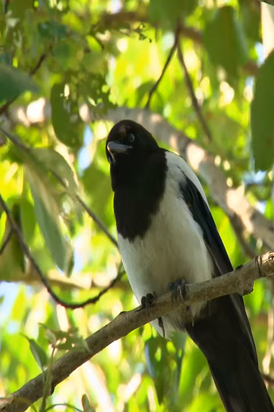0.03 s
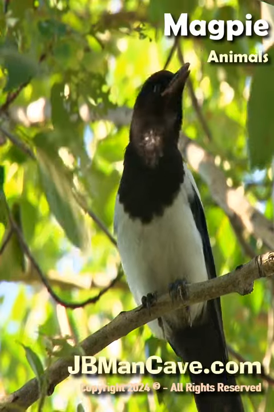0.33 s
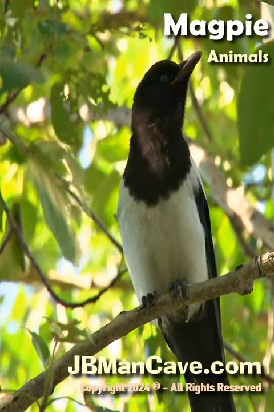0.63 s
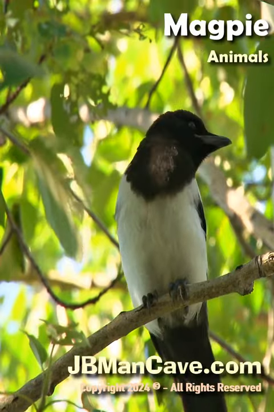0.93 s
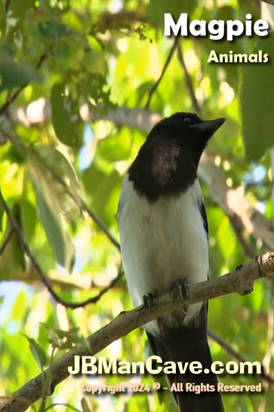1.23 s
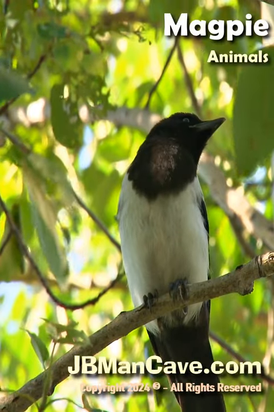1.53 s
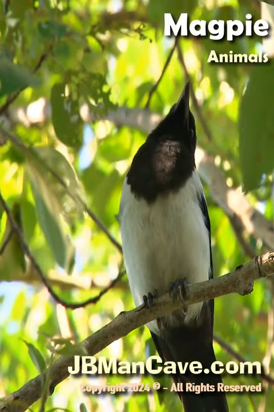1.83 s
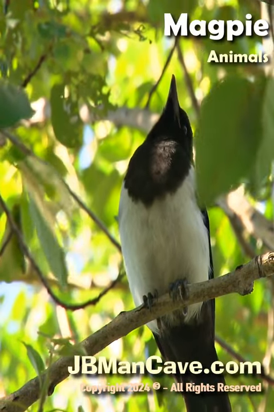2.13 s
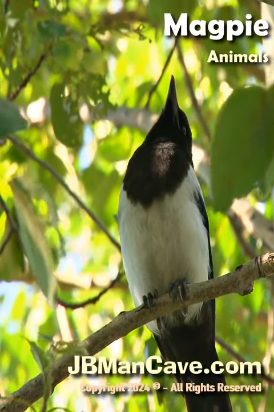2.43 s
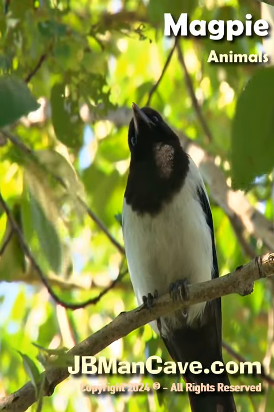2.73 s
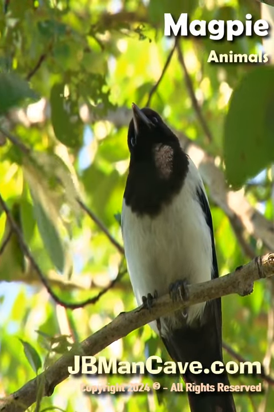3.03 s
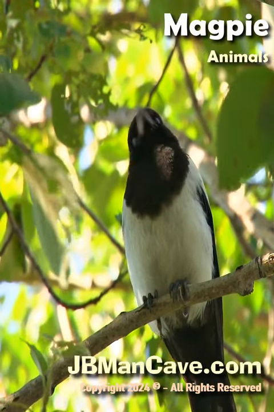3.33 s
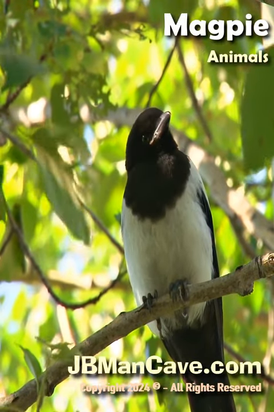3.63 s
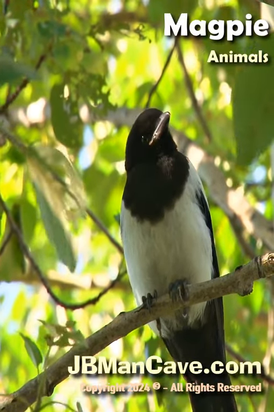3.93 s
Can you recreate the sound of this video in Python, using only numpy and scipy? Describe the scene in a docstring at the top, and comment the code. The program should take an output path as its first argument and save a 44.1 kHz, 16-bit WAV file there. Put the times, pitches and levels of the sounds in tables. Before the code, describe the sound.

Hollow throat pops and tiny squeaks from a nearby magpie, with leaf crackles and faint whistles.

```python
"""Among trees, over a steady outdoor hush and a faint low hum, a magpie mutters on a branch close by. Its
throat rings with hollow pops and it gives soft squeaks, amid small dry ticks of bill and leaves. Farther off a
songbird whistles two short phrases, a still farther bird gives rough buzzing sweeps, and another bird gives
very thin high calls, all near-pure bending tones that the trunks and leaves scatter into echoes."""
import sys
import numpy as np
from scipy import signal
from scipy.io import wavfile

SR = 44100
rng = np.random.default_rng(int(sys.argv[2]) if len(sys.argv) > 2 else 0)


def waveform_to_disk(signal):
    """Save audio, clipped to [-1, 1], as 16-bit WAV at the path in sys.argv[1]."""
    frames = np.transpose(np.atleast_2d(signal))
    scaled = np.clip(frames, -1, 1) * 32767
    samples = np.round(scaled).astype(np.int16)
    wavfile.write(sys.argv[1], SR, samples)


N = 176400
T = np.arange(N) / SR


def from_db(db):
    """Decibels to gain."""
    return 10 ** (np.asarray(db) / 20)


def rms_one(x):
    """Scale to rms 1."""
    return x / np.sqrt(np.mean(x ** 2) + 1e-20)


def at_hz(points, hz):
    """Read a table on a log-frequency axis."""
    freqs, values = np.transpose(points)
    return np.interp(np.log(hz), np.log(freqs), values)


def decay(t, t60):
    """Exponential decay, 60 dB down at t60."""
    return np.exp(-np.log(1000) * t / t60)


def butter(x, order, hz, kind):
    """Butterworth filter."""
    return signal.sosfilt(signal.butter(order, hz, kind, fs=SR, output="sos"), x)


def drift(rate_hz):
    """Smooth random motion of spread 1."""
    step, warm_up = 40, 2000
    pole = np.exp(-2 * np.pi * rate_hz * step / SR)
    noise = rng.standard_normal(N // step + warm_up + 2)
    slow = signal.lfilter([1], [1, -2 * pole, pole * pole], noise)[warm_up:]
    return np.interp(np.arange(N) / step, np.arange(len(slow)), rms_one(slow))


def add(out, start_s, sound):
    """Mix a sound in at its start time."""
    i = max(int(start_s * SR), 0)
    out[i:i + len(sound)] += sound[:max(N - i, 0)]


# The colour of the hush. Each row: frequency in Hz, relative spectral level in dB.
HUSH_COLOUR = [(25, -11), (64, 0), (84, -2.5), (120, -10), (166, -6.5), (212, -7), (354, -9.5), (531, -8),
               (1020, -11.5), (1400, -5.5), (2050, -10.5), (3160, -9), (5000, -16), (7920, -23.5),
               (10700, -35), (16000, -40)]
# Its top end eases down. Each row: time in seconds, treble gain in dB.
HUSH_TREBLE = [(0, -0.5), (1.4, -1), (2.6, -2), (4, -2)]
# Its stereo image. Each row: frequency in Hz, left-right likeness from 0 (wide) to 1 (mono).
HUSH_LIKENESS = [(30, 0.97), (90, 0.33), (180, 0.66), (350, 0.16), (700, 0.49), (1400, 0.77), (3000, 0.84),
                 (12000, 0.68)]
HUSH_DB, HUSH_FLICKER_DB, TREBLE_HZ = -34, 0.83, 2510

def hush():
    """A bed of far outdoor noise in third-octave bands, each flickering a little."""
    out, edges = 0, 22 * 2 ** (np.arange(30) / 3)
    white = rng.standard_normal((2, 2, N))
    treble_db = np.interp(T, *np.transpose(HUSH_TREBLE))
    for k, (low, high) in enumerate(zip(edges, edges[1:])):
        mid, side = butter(white[k % 2], 2, [low, high], "band")  # neighbours get unrelated noise
        hz = np.sqrt(low * high)
        alike = at_hz(HUSH_LIKENESS, hz)
        db = at_hz(HUSH_COLOUR, hz) + HUSH_FLICKER_DB * drift(5.8) + treble_db * (hz > TREBLE_HZ)
        band = np.sqrt(1 + alike) * mid + np.sqrt(1 - alike) * side * [[1], [-1]]
        out = out + from_db(db) * band
    return from_db(HUSH_DB) * rms_one(out)


# The drone under the hush. Each row: pitch in Hz, centre rms level in dB.
HUM_TONES = [(43, -49), (80, -50), (170, -54)]

def hum(swing_db=4.5, waver_hz=2.07):
    """Low wavering tones, as of far traffic."""
    out = np.zeros(N)
    for hz, db in HUM_TONES:
        gain = np.sqrt(2) * from_db(db + swing_db * drift(11))
        phase = 2 * np.pi * np.cumsum(hz + waver_hz * drift(5.7)) / SR
        out += gain * np.sin(phase)
    return out


def tree_echoes(x, t60, build_s, echoes_per_s=1500, side_db=-13.5):
    """Many small echoes from trunks and leaves, mostly alike in both channels."""
    t = T[:SR]
    echoes = rng.standard_normal((2, SR)) * (rng.random(SR) < echoes_per_s / SR)
    echoes *= decay(t, t60) * (1 - np.exp(-(t / build_s) ** 2))
    mid, side = echoes / np.sqrt(np.sum(echoes ** 2, axis=1, keepdims=True))
    return np.array([signal.fftconvolve(x, mid + sign * from_db(side_db) * side)[:N] for sign in (1, -1)])


def sing(notes, waver, fade_s, flutter_db=1.5):
    """A bird's voice: sine notes bending through three pitches, roughened by a fast pitch waver."""
    out, unsteady = np.zeros(N), 1 + waver * drift(139)
    for start, length, first, middle, last, db in notes:
        t = T[:int(length * SR)]
        bend = np.polyfit([0, .5, 1], [first, middle, last], 2)
        hz = np.polyval(bend, t / length) * np.interp(start + t, T, unsteady)
        swell = np.sin(np.pi / 2 * np.clip(np.minimum(t, length - t) / fade_s, 0, 1))
        add(out, start, from_db(db) * swell * np.sin(2 * np.pi * np.cumsum(hz) / SR))
    return out * from_db(flutter_db * drift(50))


# Wisps of high tone. Each row: start and length in seconds, first, middle and last pitch in Hz,
# level in dB.
THIN_CALLS = [(.22, 0.12, 8240, 8080, 7900, -39), (.28, 0.12, 7640, 7540, 7530, -36.5),
              (.408, 0.053, 7720, 7760, 7350, -32.5), (1.08, 0.065, 8240, 8150, 8030, -42),
              (1.275, 0.035, 7520, 7460, 7350, -33), (1.31, .07, 7920, 7650, 7650, -42.5),
              (1.398, 0.064, 7370, 7370, 7360, -31), (1.578, 0.023, 7540, 7100, 7450, -27.5),
              (1.597, 0.05, 7500, 7550, 7070, -35.5), (1.635, 0.049, 7600, 7600, 7900, -37.5),
              (1.735, .05, 7800, 8200, 7800, -43), (1.785, 0.025, 8300, 7650, 7450, -37),
              (1.815, 0.04, 8150, 7930, 7100, -38), (1.932, 0.029, 7410, 7200, 7650, -26.5),
              (1.96, 0.027, 8060, 7600, 7050, -32), (3.56, 0.16, 7200, 8250, 8270, -54),
              (3.755, 0.24, 8100, 7830, 7650, -51.5)]

def thin_caller(direct_db=-3.5, echo_db=-1.5):
    """A far bird's very thin calls, scattered by the trees."""
    calls = sing(THIN_CALLS, waver=.016, fade_s=.013)
    return from_db(direct_db) * calls + from_db(echo_db) * tree_echoes(calls, t60=0.46, build_s=0.008)


# The song's clear notes. Each row: start and length in seconds, first, middle and last pitch in Hz,
# level in dB.
SONG_WHISTLES = [(.02, 0.082, 3068, 3060, 2985, -31.5), (.717, 0.027, 3500, 3270, 3520, -23),
                 (.755, 0.024, 3700, 3220, 3330, -22.5), (.777, 0.02, 4000, 4090, 4010, -23.5),
                 (.795, 0.026, 3280, 2980, 2950, -30), (.82, 0.016, 3830, 3990, 3880, -27),
                 (.826, .014, 3050, 3350, 3130, -25), (.84, .021, 3020, 2950, 2950, -30),
                 (.869, .014, 3620, 3200, 2950, -24.5), (.882, 0.025, 2900, 2870, 2890, -30),
                 (.906, 0.031, 2680, 2440, 2520, -31), (.942, 0.02, 3280, 3140, 3170, -30.5),
                 (1.03, 0.02, 3050, 3000, 3170, -33), (2.103, 0.072, 3080, 3130, 2740, -27.5),
                 (2.108, 0.064, 3590, 3420, 3080, -31), (2.174, 0.04, 2680, 2610, 2520, -29),
                 (2.274, .122, 2950, 3825, 3560, -22.5), (2.392, 0.05, 3560, 3290, 3000, -29)]
# A second, farther bird's buzzy sweeps, with the same columns.
FAR_BIRD_BUZZES = [(.781, 0.031, 4700, 4820, 4350, -31), (.8, .1, 4100, 3804, 3826, -32),
                   (1.43, 0.083, 4200, 4170, 4530, -37)]

def songbird(whistle_echo_db=-3.5, buzz_direct_db=-4):
    """Far birds through the trees: the song's clean whistles, and a farther bird's rough buzzes heard mostly as
    echo."""
    whistles = sing(SONG_WHISTLES, waver=.005, fade_s=0.0054)
    buzzes = sing(FAR_BIRD_BUZZES, waver=0.0735, fade_s=0.0078)
    echoes = tree_echoes(from_db(whistle_echo_db) * whistles + buzzes, t60=.7, build_s=0.025)
    return whistles + from_db(buzz_direct_db) * buzzes + echoes


def crack(low_hz, body_db, spike_db=-4):
    """A dry snap: a spike and a brief noisy tail, bright above low_hz, with a midrange body."""
    t = T[:SR // 30]
    envelope = decay(t, t60=0.011) + from_db(spike_db) * decay(t, t60=0.00063)
    burst = envelope * rng.standard_normal(len(t))
    bright = butter(burst, 2, low_hz, "high")
    body = butter(burst, 2, [1200, 6000], "band")
    return bright - from_db(body_db) * body


# Leaf snaps that stand out. Each row: start in seconds, level in dB, low cut in Hz.
LEAF_SNAPS = [(.1112, -23.5, 12000), (0.159, -22, 11000), (.308, -24, 9000), (0.88, -28, 12000),
              (1.183, -28, 10000), (1.373, -11, 11200), (1.558, -24, 7000), (1.742, -16.5, 12800),
              (1.9198, -24, 13100), (1.986, -29, 8000), (2.2248, -28, 9500), (2.627, -20.5, 13200)]
# Bursts of crackle. Each row: time in seconds, lift in dB of both density and strength.
LEAF_BURSTS = [(.1, -0.5), (.45, 10), (.6, -10), (1.08, -5), (1.2, 11.5), (1.3, 2.5), (1.9, 0.5),
               (2.15, -6.5), (2.45, 7.5), (2.72, -16), (2.9, 5), (3.1, -12.5), (3.3, 5.5), (3.55, 3.5),
               (3.7, 1), (3.95, 3.5)]
# The faint snaps ring between a lowest and a highest pitch in Hz.
LEAF_RING_HZ = (4500, 12000)
# Each faint snap takes one of these low cuts in Hz.
LEAF_CUTS_HZ = (10000, 12500, 14000)
RING_T60_S = 0.0084  # leaves and bill ring equally briefly

def leaf_rustle(base_per_s=50, faint_db=-48, spread_db=5, body_db=-14, ring_db=-2):
    """Dry leaves: a few clear snaps over many faint ones, denser and stronger in each burst."""
    out, t = np.zeros(N), T[:SR // 30]
    stir = from_db(np.interp(T, *np.transpose(LEAF_BURSTS)))
    for start, db, low_hz in LEAF_SNAPS:
        add(out, start, from_db(db) * crack(low_hz, body_db))
    for i in np.flatnonzero(rng.random(N) < stir * base_per_s / SR):
        size = stir[i] * from_db(faint_db + spread_db * min(rng.exponential(), 3))
        ring = np.sin(2 * np.pi * rng.uniform(*LEAF_RING_HZ) * t) * decay(t, RING_T60_S)
        snap = crack(rng.choice(LEAF_CUTS_HZ), body_db)
        add(out, T[i], size * (snap + from_db(ring_db) * ring))
    return out


# Small dry ticks. Each row: start in seconds, ring pitch in Hz, ring level in dB, crack level in dB.
TICKS = [(0.1112, 3800, -18, -21), (0.2641, 5100, -17, -21.5), (.295, 3920, -15, -22.5),
         (0.2964, 6840, -18, -32), (0.323, 2040, -21, -35), (0.3294, 10900, -18, -19.5),
         (.364, 3100, -18, -18), (0.3639, 6070, -14.5, -16), (.344, 5900, -17, -38),
         (0.3725, 3630, -17.5, -25), (0.3735, 6400, -14, -39), (0.3787, 6660, -6.5, -39),
         (0.43, 7730, -15, -28), (0.432, 12200, -16, -17.5), (.501, 3060, -19.5, -23),
         (0.501, 12070, -13.5, -30), (1.219, 4370, -21.5, -34), (1.2903, 8300, -17.5, -24),
         (1.3741, 2230, -8.5, -27), (1.375, 4430, -15.5, -18.5), (1.3743, 560, -17.5, -40),
         (1.4318, 11800, -22.5, -26), (1.4897, 9900, -28, -23), (1.511, 4000, -22, -29),
         (1.82, 3900, -18.5, -38), (2.4053, 3260, -10, -25), (2.417, 6050, -23, -30),
         (2.424, 2800, -14, -23), (2.435, 8270, -11, -21), (2.446, 10300, -30, -33),
         (2.479, 11100, -19, -33), (2.4817, 3650, -12.5, -26), (2.661, 4860, -19.5, -30),
         (2.828, 3900, -14.5, -20), (2.875, 8800, -29, -36), (2.9042, 9150, -25, -23),
         (2.987, 4100, -22, -45), (3.46, 3070, -15.5, -39), (3.524, 3140, -18.5, -32)]

def ticks(attack_s=0.0001, crack_trim_db=-0.5):
    """Bill and leaves tick, each with a bright crack and a very short ring."""
    out, t = np.zeros(N), T[:SR // 30]
    envelope = (1 - np.exp(-t / attack_s)) * decay(t, RING_T60_S)
    for start, hz, ring_db, crack_db in TICKS:
        add(out, start, from_db(ring_db) * np.sin(2 * np.pi * hz * t) * envelope)
        add(out, start, from_db(crack_db + crack_trim_db) * crack(low_hz=7000, body_db=0))
    return out


# Tiny squeaks, most of them rising. Each row: start and length in seconds, first, middle and last
# pitch in Hz, level in dB.
MAGPIE_SQUEAKS = [(.39, 0.011, 1210, 1220, 1260, -27), (.432, 0.01, 1200, 1190, 1150, -28),
                  (1.326, 0.012, 1960, 2190, 2700, -30), (2.875, 0.017, 1950, 2060, 2200, -30.5),
                  (2.903, 0.023, 1480, 1930, 2180, -31.5), (2.897, 0.021, 1170, 1206, 1250, -28),
                  (2.914, 0.049, 879, 694, 734, -31), (2.978, 0.021, 1540, 1690, 2140, -30.5),
                  (3.228, 0.0274, 2300, 2470, 2770, -27), (3.226, 0.01, 1530, 1530, 1450, -29.5),
                  (3.386, 0.012, 3200, 3130, 3370, -26.5), (3.522, 0.018, 940, 1214, 1520, -28)]

def magpie_squeaks():
    """The magpie's soft voice, made grainy by a fast, deep flutter in level."""
    return sing(MAGPIE_SQUEAKS, waver=.04, fade_s=.003) * (.65 + .55 * drift(260))


# Hollow pops. Each row: start in seconds, level in dB, first and settled pitch in Hz,
# rough ring time in seconds.
MAGPIE_POPS = [(0.5002, -16.5, 1460, 615, 0.03), (1.375, -12.5, 1310, 1205, 0.033),
               (1.387, -24, 1220, 1200, 0.066), (1.5115, -17, 1016, 939, 0.057),
               (2.4055, -11.5, 1230, 1096, 0.083), (2.6609, -7.5, 1130, 1000, 0.033),
               (2.9794, -10, 1190, 1015, 0.023)]
POP_CHOKE = 1.34  # above 1: the throat damps the ring faster and faster
POP_SETTLE_SHARE = 0.075  # time the pitch takes to sink, as a share of the ring

def magpie_pops(attack_s=0.00055, overtone_db=-25):
    """The throat cavity rings at once and its pitch sinks as it dies."""
    out, t = np.zeros(N), T[:SR // 8]
    for start, db, first, settled, ring_s in MAGPIE_POPS:
        hz = settled + (first - settled) * np.exp(-t / (POP_SETTLE_SHARE * ring_s))
        phase = 2 * np.pi * np.cumsum(hz) / SR
        tone = np.sin(phase) + from_db(overtone_db) * np.sin(2 * phase)
        envelope = (1 - np.exp(-t / attack_s)) * decay((t / ring_s) ** POP_CHOKE, 0.94)
        add(out, start, from_db(db) * tone * envelope)
    return out


def scene(reflection_db=-13):
    """The bed, the far birds, and up front the magpie and leaves with a short dull reflection."""
    background = hush() + hum() + thin_caller() + songbird()
    near = leaf_rustle() + ticks() + magpie_squeaks() + magpie_pops()
    reflection = butter(tree_echoes(near, t60=0.078, build_s=0.0033), 1, 6000, "low")
    return background + near + from_db(reflection_db) * reflection


def record(dry, silence_s=0.0581, fade_s=0.0087, cutoff_hz=16000):
    """A quick fade-in after a moment of silence, and a steep cut of the very top."""
    opened = dry * np.clip((T - silence_s) / fade_s, 0, 1)
    return signal.sosfilt(signal.ellip(10, .2, 70, cutoff_hz, fs=SR, output="sos"), opened)


dry = scene()
out = record(dry)
waveform_to_disk(out)
```